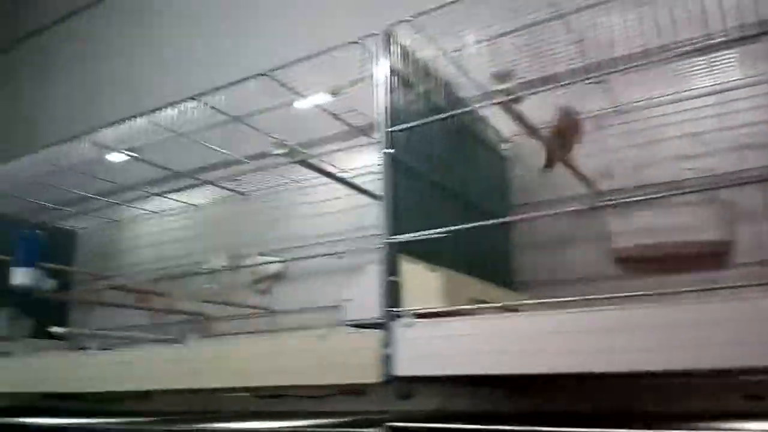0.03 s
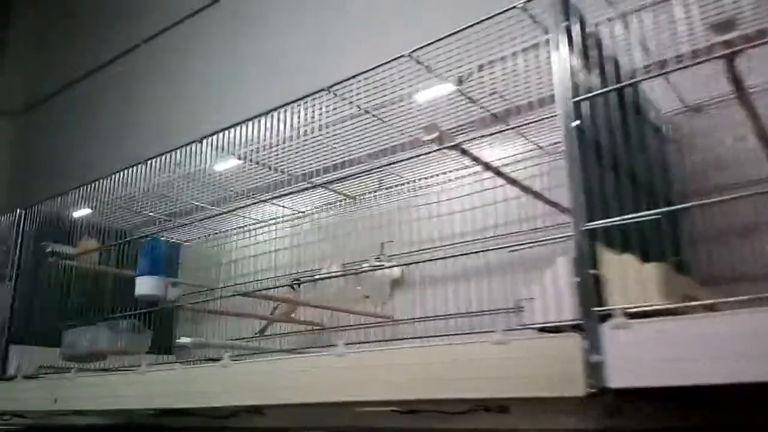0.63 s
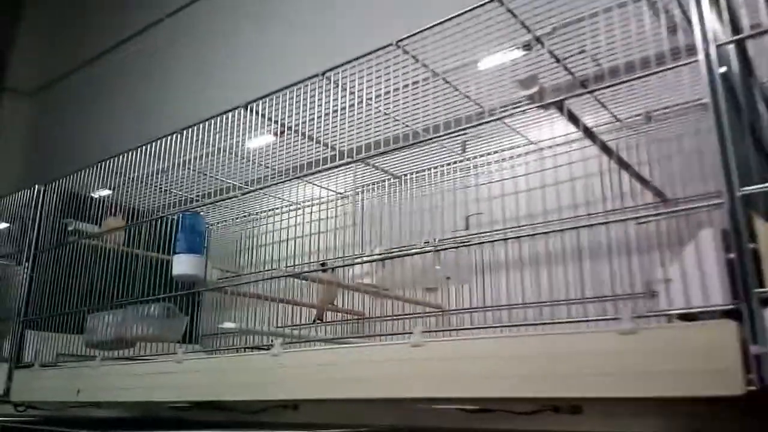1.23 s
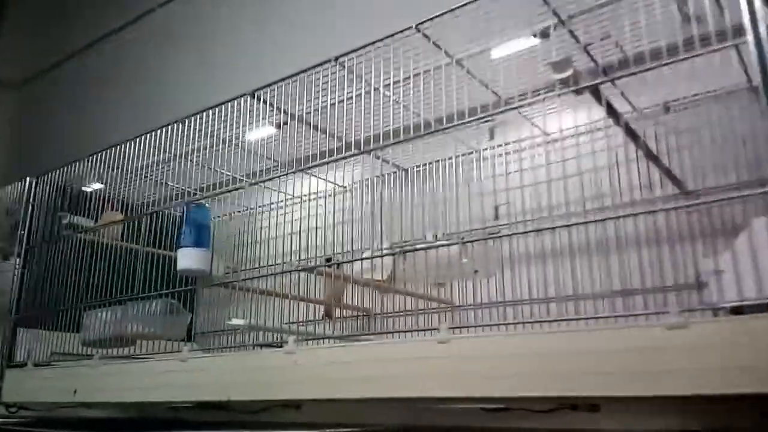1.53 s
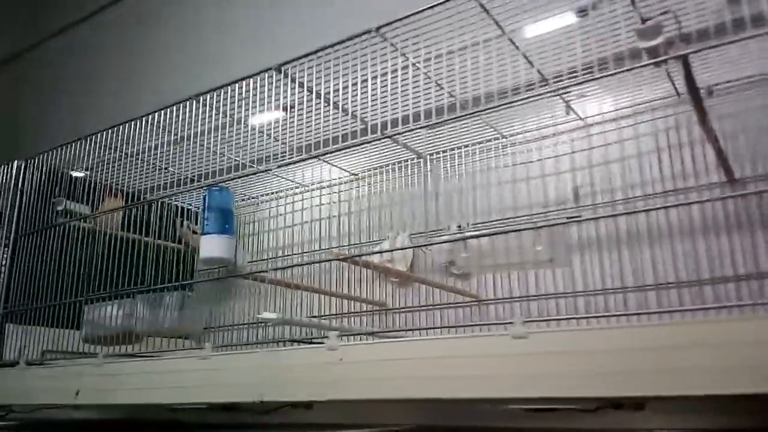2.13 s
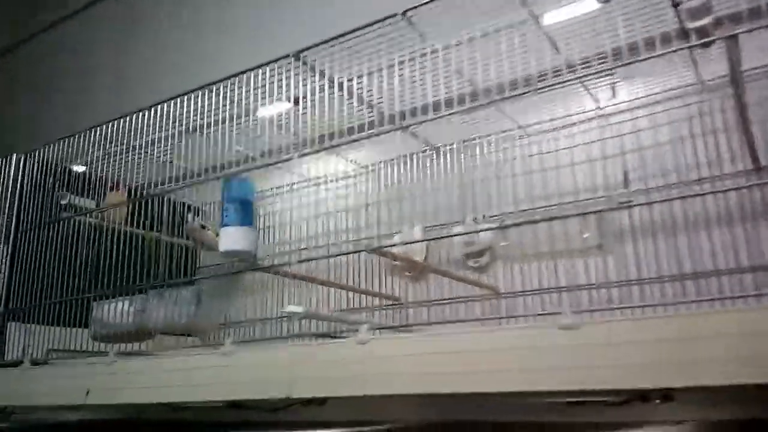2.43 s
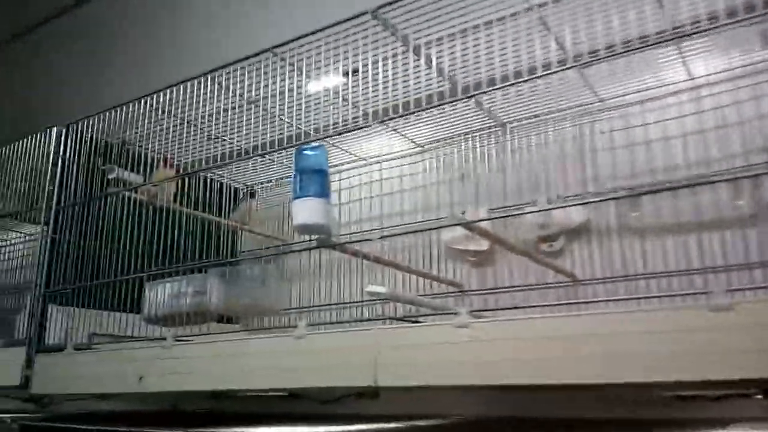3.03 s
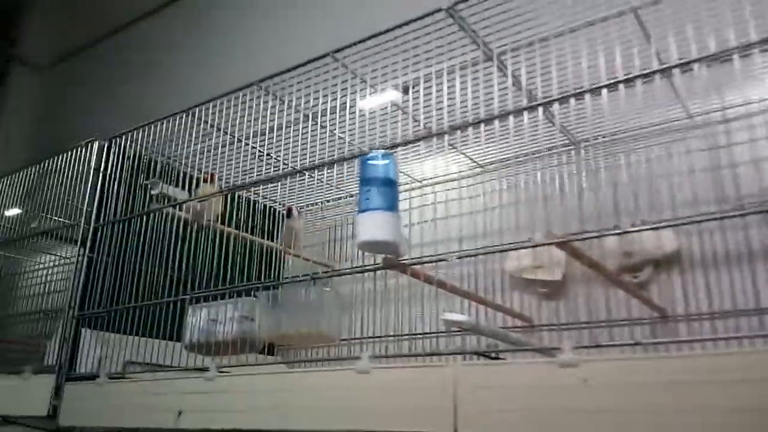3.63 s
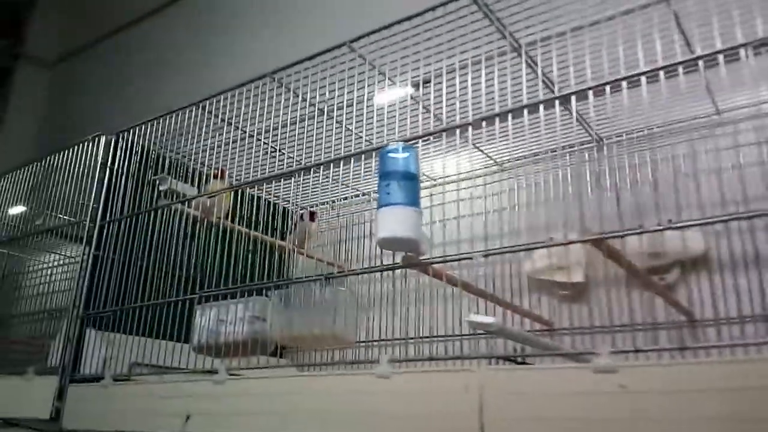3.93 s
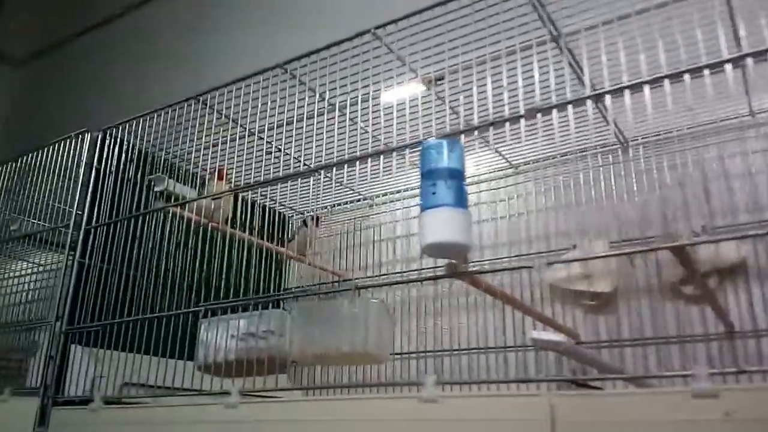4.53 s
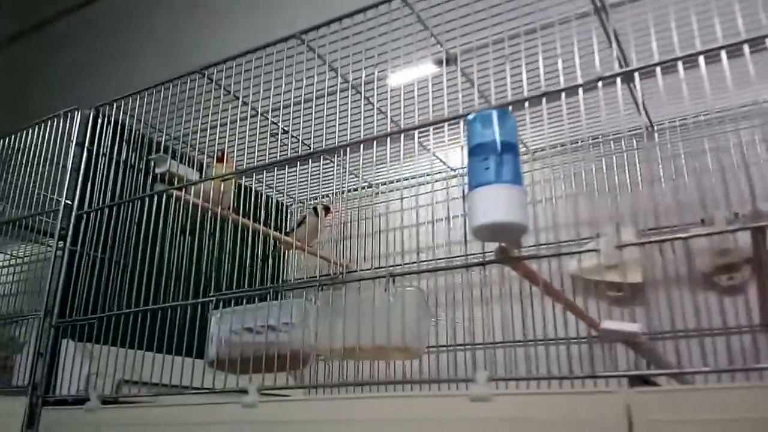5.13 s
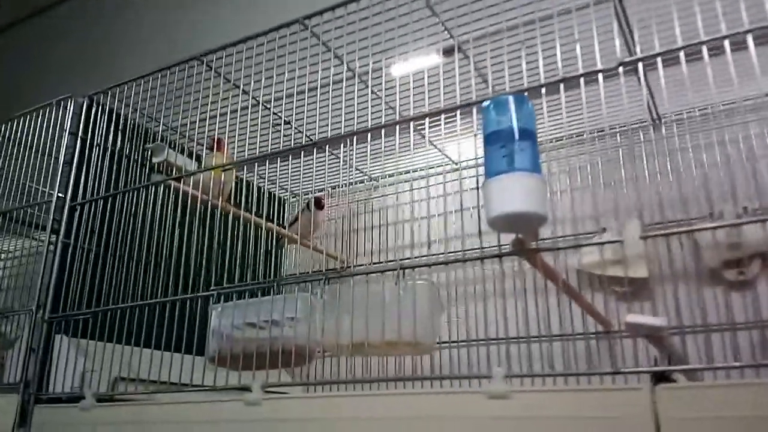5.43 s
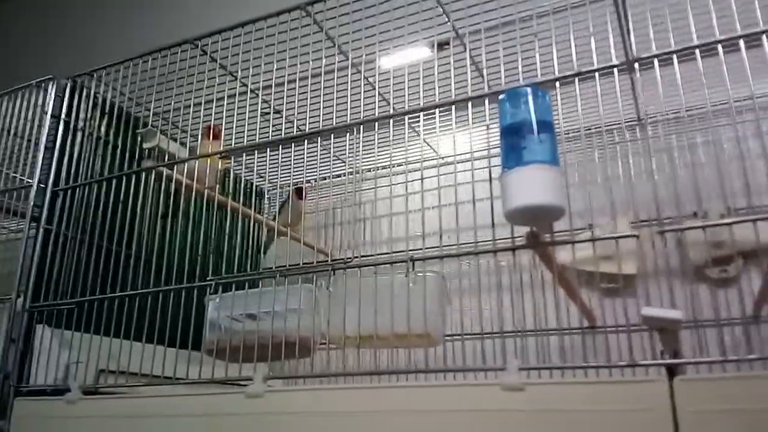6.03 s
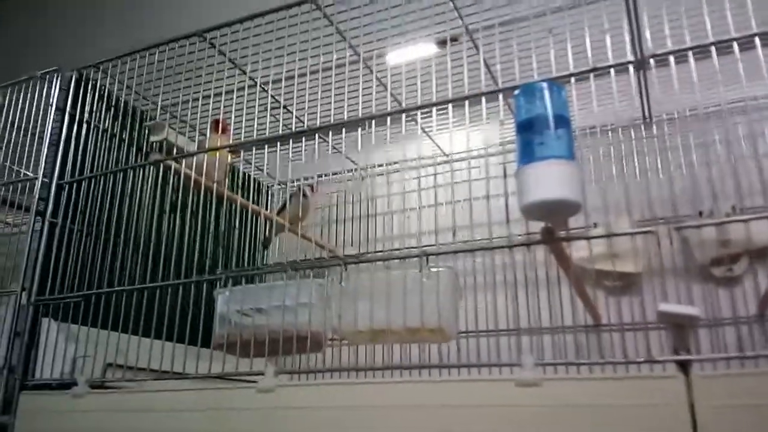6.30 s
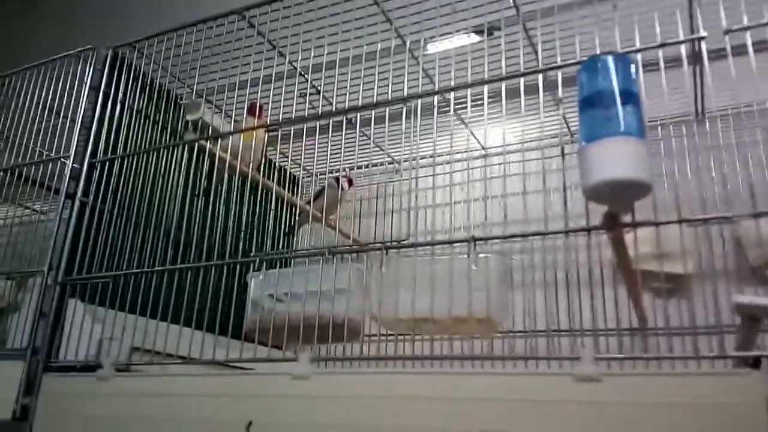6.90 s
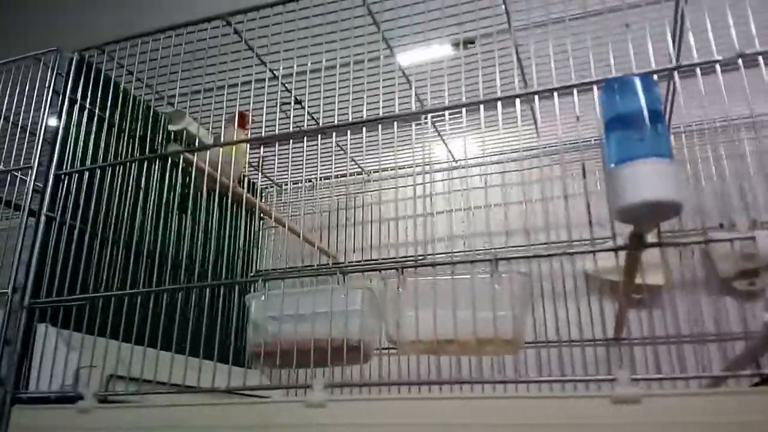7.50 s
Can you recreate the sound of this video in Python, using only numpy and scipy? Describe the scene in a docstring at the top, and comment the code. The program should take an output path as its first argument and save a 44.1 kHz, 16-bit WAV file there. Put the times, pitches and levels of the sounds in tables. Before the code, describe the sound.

Small caged finches twitter in a bare, echoing room. A loud, harsh rasp opens, lasting about a third of a second, followed by thin high pips, clear tweets and rough falling chirps around 1 second, with a light cage tap. From about 1.8 to 2.3 seconds comes a longer, softer rasp with a quick downward trill. Bright tweets follow near 2.7 seconds and more pips until 3.5. The middle is quieter: rising mews, held whistles, an arching call at about 4.3 and short buzzy churrs until 6. A sharp tweet stands out at 6.2, and high pips return after 7.2, with a few light taps on wire and perches. A slight bright microphone sizzle follows the calls. Underneath are steady room noise, a faint low electric hum, the soft rustle of someone moving along the cages and a few dull microphone bumps, mostly in the first two seconds.

```python
"""Caged finches twitter in a bare, echoing bird room: two harsh rasps, gliding calls, thin high pips.
Each call is two near-pure tones, one from each side of the syrinx, roughened by a fast tremor. A hiss
with a bright microphone sizzle follows their loudness. Light cage taps ring in the same room. Underneath
sit a faint electric hum, room noise, and the soft rustle and knocks of someone moving along the cages."""
import sys
import numpy as np
from scipy import signal
from scipy.fft import rfft, irfft, next_fast_len
from scipy.io import wavfile
from scipy.ndimage import uniform_filter1d, map_coordinates

SR = 44100
rng = np.random.default_rng(int(sys.argv[2]) if len(sys.argv) > 2 else 0)


def materialize(psi):
    """Save the field psi as 16-bit PCM at rate SR to the path in sys.argv[1].

    A 1-D psi becomes a single channel; in a 2-D psi each row is a channel.
    """
    bounded = np.clip(np.atleast_2d(psi).T, -1, 1)
    quanta = np.round(bounded * 32767).astype(np.int16)
    wavfile.write(sys.argv[1], SR, quanta)


N = 342216

# room tone: (frequency [Hz], relative density [dB])
ROOM_TONE_SPECTRUM = [(25, -16.5), (50, -10.5), (72, -16.5), (105, 8.5), (160, -11.5), (303, -3.5),
                      (385, -10), (637, -11.5), (1100, -7.5), (3180, -8.5), (3950, -16), (6380, -18),
                      (8000, -30.5), (13400, -31), (15000, -18.5)]
# slow ride of the electric hum: (time [s], level [dB])
HUM_LEVELS = [(0, -76), (3.5, -81), (5.4, -71), (5.8, -68), (7.76, -65)]
# soft bumps: (time [s], peak [dB])
KNOCK_HITS = [(0.611, -33.5), (1.492, -35), (1.751, -38), (5.907, -45.5)]
# rustle of movement along the cages: (time [s], relative level [dB])
RUSTLE_LEVELS = [(0.0, -51), (0.19, -56.5), (0.41, -44), (0.88, -51.5), (0.91, -47.5), (1.25, -56.5),
                 (1.47, -56.5), (1.49, -53), (1.53, -54.5), (1.58, -46), (1.79, -54), (1.9, -46.5),
                 (2.4, -56.5), (2.72, -54.5), (2.85, -47.5), (3.46, -50.5), (3.95, -60.5), (4.39, -56.5),
                 (5.53, -63.5), (6.07, -64), (6.27, -53.5), (6.57, -61), (6.72, -46), (6.85, -53.5),
                 (6.92, -47), (7.13, -52.5), (7.69, -46.5), (7.76, -52)]
# brushing cloth and hands: (frequency [Hz], relative density [dB])
RUSTLE_SPECTRUM = [(41, -22), (70, -6.5), (141, -3.5), (297, -1), (408, -4), (627, -5.5), (1130, -9.5),
                   (1810, -14.5), (2220, -16), (2780, -19.5), (3910, -19.5), (6420, -31.5), (8230, -45),
                   (15500, -34.5)]
# reverb decay: (frequency [Hz], time to fall 60 dB [s])
REVERB_TIMES = [(1500, 0.8), (3000, 0.56), (5000, 0.53), (7000, 0.47), (15000, 0.22)]
# light taps on the cages: (time [s], dry peak [dB])
TAP_HITS = [(.888, -26), (1.755, -55), (6.634, -36), (6.681, -44), (6.924, -53), (7.287, -39), (7.656, -37)]
# tone of a tap: (frequency [Hz], relative density [dB])
TAP_SPECTRUM = [(200, -13), (600, -14), (1100, 6.5), (2000, -1), (4000, 6.5), (6500, -17), (8500, -38)]
# hoarse patches in the calls: (time [s], length [s], dry level [dB])
HOARSE_PATCHES = [(1.841, 0.51, -46), (4.155, 0.12, -50), (5.604, 0.086, -46.5), (5.799, 0.069, -51)]
# a breaking voice: (frequency [Hz], relative density [dB])
HOARSE_SPECTRUM = [(1200, -34), (1900, 10), (3000, 19), (5200, 5), (6600, -10), (8000, -22.5), (10000, -17),
                   (12000, -32), (13700, -32), (15000, -4.5)]
# hiss around the calls, with microphone sizzle near 15 kHz: (frequency [Hz], relative density [dB])
HISS_SPECTRUM = [(1000, -10), (3000, 10.5), (6500, -6), (8300, -3), (10000, -4), (11500, -12.5), (13700, 4),
                 (14700, 8.5), (16000, -8)]
# microphone colour on the calls, whose levels below are set ahead of it: (frequency [Hz], gain [dB])
SONG_EQ = [(3000, 0), (7000, -5.5), (7700, -15.5), (8400, -22), (10000, -15), (11500, -3), (13500, 0),
           (15000, 11)]
# long rising mews:
# (time [s], length [s], start pitch [Hz], end pitch [Hz], lower voice [dB], octave voice [dB])
MEW_NOTES = [(2.398, 0.28, 1685, 1989, -54, -48), (3.657, 0.28, 1593, 1997, -54.5, -56.5),
             (4.97, .29, 1492, 2084, -54.5, -46.5), (5.537, 0.14, 1736, 2020, -58, -65),
             (6.402, .19, 1557, 2366, -58.5, -74), (6.577, 0.17, 1658, 2008, -53, -51),
             (7.607, 0.15, 1530, 1842, -56.5, -51)]
# held whistles; an upper pitch near or above the octave is pulled onto it:
# (time [s], length [s], lower pitch [Hz], upper pitch [Hz], lower voice [dB], upper voice [dB])
WHISTLE_NOTES = [(1.04, 0.12, 1398, 2804, -56, -45.5), (1.095, 0.076, 1770, 3510, -48, -49),
                 (2.541, .34, 1472, 3000, -50.5, -44.5), (4.155, 0.33, 1485, 2980, -50.5, -46),
                 (5.645, 0.18, 2040, 3475, -52.5, -53.5), (5.838, 0.066, 2013, 3357, -77, -43.5),
                 (6.321, .13, 3260, 6520, -45, -56.5), (6.487, .16, 2856, 4530, -55.5, -73)]
# buzzy churrs: (time [s], length [s], upper/lower pitch [ratio], lower voice [dB])
CHURR_NOTES = [(4.503, 0.046, 1.48, -48.5), (4.62, .066, 1.36, -45), (4.95, 0.039, 1.42, -46.5),
               (5.317, 0.14, 1.31, -44), (5.613, .115, 1.25, -42.5), (5.803, .074, 1.22, -46)]
# rough falling slides:
# (time [s], length [s], start pitch [Hz], upper/lower pitch [ratio], lower voice [dB], upper voice [dB])
SLIDE_NOTES = [(0.309, 0.08, 6230, 1.24, -58, -44), (0.95, .046, 3350, 1.22, -38, -36.5),
               (0.998, .051, 3373, 1.244, -33, -29.5), (1.036, 0.0463, 3070, 1.2, -41.5, -48),
               (1.451, 0.05, 2853, 1.39, -47.5, -50.5), (2.739, 0.072, 3372, 1.274, -35, -33.5),
               (2.79, 0.072, 3160, 1.28, -40.5, -42), (3.609, 0.0515, 3035, 1.42, -50, -49.5),
               (4.389, 0.091, 4250, 1, -52, -60), (6.283, .068, 3954, 1.33, -34.5, -53)]
# one arching call: (time [s], top pitch [Hz], lower voice [dB], octave voice [dB], buzz [share of pitch])
ARCH_CURVE = [(4.173, 1900, -75, -44, 0.32), (4.23, 2696, -50.5, -42, 0.2), (4.3, 3163, -44, -42.5, .1),
              (4.335, 3228, -37.5, -44.5, 0.024), (4.415, 3005, -36.5, -57, 0.026),
              (4.43, 3073, -39, -58, 0.036), (4.47, 2830, -37.5, -62, 0.045)]
# clear scooping tweets: (time [s], length [s], top pitch [Hz], scoop [share of pitch],
# upper/lower pitch [ratio], lower voice [dB], upper voice [dB], buzz [share of pitch])
TWEET_NOTES = [(0.182, .05, 5130, 0.12, 1.1, -31, -64, .004),
               (0.834, 0.077, 3810, 0.073, 1.25, -29.5, -30.5, 0.015),
               (1.737, 0.0828, 3980, 0.1094, 1.23, -29, -33.5, 0.021),
               (2.599, 0.093, 3690, 0.032, 1.247, -34.5, -35.5, 0.0069),
               (2.876, 0.13, 2314, 0.17, 1.15, -48, -59, 0.02),
               (3.921, 0.11, 2345, 0.08, 1.31, -52, -53.5, 0.014),
               (4.834, 0.092, 2350, 0.0388, 1.25, -57, -62, .005),
               (6.222, 0.079, 4130, 0.097, 1.285, -29, -32.5, 0.023),
               (7.605, 0.18, 2350, .06, 1.28, -56, -61, .008)]
# thin high pips: (time [s], lower pitch [Hz], upper pitch [Hz], opening bend [share of pitch],
# lower voice [dB], upper voice [dB])
PIP_NOTES = [(.362, 5090, 5770, 0.17, -40, -47.5), (.682, 5960, 7110, 0.055, -42.5, -43.5),
             (.911, 5630, 6580, 0.11, -47.5, -55), (1.461, 5490, 6830, 0.054, -46.5, -52),
             (1.665, 6020, 6970, 0.036, -41, -43.5), (1.803, 4800, 7130, 0.21, -40, -40.5),
             (1.864, 5600, 6450, 0.028, -38, -34), (2.032, 5740, 6700, .16, -32, -39.5),
             (2.212, 5840, 6460, .12, -45, -46), (2.28, 5670, 6340, 0.18, -44, -56),
             (3.13, 5925, 6500, -0.049, -40.5, -75), (3.365, 5500, 6840, 0.126, -38, -41),
             (3.545, 5190, 6400, 0.094, -34, -41), (7.262, 5720, 7130, 0.14, -33.5, -42),
             (7.382, 5140, 6040, 0.14, -35.5, -38.5), (7.667, 5980, 6660, 0.043, -46.5, -75)]
# down-slurs of the trill: (time [s], lower voice [dB])
TRILL_NOTES = [(1.872, -35), (1.936, -34.5), (2.004, -35), (2.07, -37), (2.143, -35.5), (2.213, -54)]
# throat and beak resonance in a rasp: (frequency [Hz], relative gain [dB])
THROAT_RESONANCE = [(1500, -17), (2300, -12.5), (3000, -10), (3500, -0.5), (4000, 4), (4500, -5),
                    (4900, 0.5), (5500, -15.5), (7000, -20)]
# the loud opening rasp: (time [s], top of the flutter [Hz], fluttering voice [dB], held voice [dB])
LOUD_RASP_CURVE = [(0, 5400, -23.5, -29), (.05, 5445, -31.5, -34), (.12, 5000, -29.5, -27.5),
                   (.2, 4846, -32.5, -24.5), (.25, 5550, -30, -38), (.28, 5400, -34.5, -55),
                   (.32, 5160, -45, -58)]
# the longer, softer rasp: (time [s], top of the flutter [Hz], fluttering voice [dB], held voice [dB])
LONG_RASP_CURVE = [(1.835, 5250, -38, -31), (1.97, 5446, -37, -35), (2.1, 5260, -37.5, -33.5),
                   (2.25, 4840, -42, -34), (2.29, 4630, -50, -34)]


def from_db(db):
    """Decibels to gain."""
    return 10 ** (np.asarray(db) / 20)


def rms_one(x):
    """Scale to unit power."""
    return x / np.sqrt(np.mean(x ** 2) + 1e-20)


def at_hz(points, hz):
    """Read a table on a log-frequency axis."""
    known_hz, values = np.transpose(points)
    return np.interp(np.log(np.maximum(hz, 1)), np.log(known_hz), values)


def equalise(x, curve):
    """EQ by a table of (frequency [Hz], gain [dB])."""
    size = next_fast_len(len(x) + SR // 10)
    gain = from_db(at_hz(curve, np.fft.rfftfreq(size, 1 / SR)))
    return irfft(rfft(x, size) * gain, size)[:len(x)]


def noise(spectrum):
    """Coloured noise of unit power."""
    return rms_one(equalise(rng.standard_normal(N), spectrum))


def drift(t, rate_hz):
    """Smooth random modulation with a spread of about 1."""
    return map_coordinates(rng.standard_normal(1024), [t * rate_hz], order=3, mode="wrap")


def phase_of(hz):
    """Running phase in radians."""
    return 2 * np.pi * np.cumsum(hz) / SR


def fade(t, attack_s, release_s):
    """Rounded fade-in and fade-out of a note."""
    opening = np.sin(np.pi / 2 * np.clip(t / attack_s, 0, 1))
    closing = np.sin(np.pi / 2 * np.clip((t[-1] - t) / release_s, 0, 1))
    return opening * closing


def add(track, at_s, sound):
    """Mix a sound in at its cue."""
    start = int(np.clip(at_s * SR, 0, N - 1))
    track[start:start + len(sound)] += sound[:N - start]


def note_time(length_s):
    """Seconds since a note began, and its progress from 0 to 1."""
    t = np.arange(int(length_s * SR)) / SR
    return t, t / length_s


def automation(curve):
    """Seconds since a call began, then each of its controls at every sample."""
    times, *columns = np.transpose(curve)
    t, _ = note_time(times[-1] - times[0])
    return t, *(np.interp(t + times[0], times, column) for column in columns)


def room_tone(level_db=-58.5):
    """A steady bed of room noise."""
    return from_db(level_db) * noise(ROOM_TONE_SPECTRUM)


def electric_hum(pitch_hz=67, waver=0.022, throb_db=2):
    """A faint low sine that wavers in pitch and level."""
    t = np.arange(N) / SR
    level_db = np.interp(t, *np.transpose(HUM_LEVELS)) + throb_db * drift(t, 2.7)
    hz = pitch_hz * (1 + waver * drift(t, 6.7))
    return from_db(level_db) * np.sqrt(2) * np.sin(phase_of(hz))


def knocks(decay_s=0.0063, band_hz=(90, 280)):
    """Dull bumps on the microphone's housing."""
    t, track = np.arange(SR // 10) / SR, np.zeros(N)
    body = signal.butter(2, band_hz, "band", fs=SR, output="sos")
    for at_s, peak_db in KNOCK_HITS:
        bump = signal.sosfilt(body, rng.standard_normal(len(t)) * np.exp(-t / decay_s))
        add(track, at_s, from_db(peak_db) * bump / np.abs(bump).max())
    return track


def rustle(gain_db=1.0, grain_db=1.5):
    """Cloth and hands brush unevenly, swelling with each movement."""
    t = np.arange(N) / SR
    level_db = np.interp(t, *np.transpose(RUSTLE_LEVELS)) + gain_db + grain_db * drift(t, 70)
    return from_db(level_db) * noise(RUSTLE_SPECTRUM)


def taps(decay_s=0.0024):
    """Short dry contacts on perches and wire."""
    t, track = np.arange(SR // 20) / SR, np.zeros(N)
    for at_s, peak_db in TAP_HITS:
        tap = equalise(rng.standard_normal(len(t)), TAP_SPECTRUM) * np.exp(-t / decay_s)
        add(track, at_s, from_db(peak_db) * tap / np.abs(tap).max())
    return track


def room_reverb(x, direct_db=-1.5, early_db=-6.5, tail_db=-3.5, early_s=0.045, echoes=14):
    """Direct sound, hard echoes off cage walls and ceiling, then a tail whose treble dies first."""
    t, tail = np.arange(SR) / SR, np.zeros(SR)
    edges_hz = np.geomspace(700, 18000, num=9)
    for low, high in zip(edges_hz, edges_hz[1:]):
        bandpass = signal.butter(2, [low, high], "band", fs=SR, output="sos")
        decay = np.exp(-np.log(1000) * t / at_hz(REVERB_TIMES, np.sqrt(low * high)))
        tail += signal.sosfilt(bandpass, rng.standard_normal(SR)) * decay
    tail *= np.clip(t / 0.013, 0, 1)   # the tail blooms over 13 ms
    early = np.zeros(SR)
    polarities = rng.choice([-1, 1], echoes)
    delays = (rng.uniform(0.04, 1, echoes) * early_s * SR).astype(int)
    early[delays] = polarities / np.sqrt(echoes)
    response = from_db(early_db) * early + from_db(tail_db) * tail / np.linalg.norm(tail)
    response[0] += from_db(direct_db)
    return signal.fftconvolve(x, response)[:N]


def hoarseness():
    """Now and then a voice breaks into noise."""
    envelope = np.zeros(N)
    for at_s, length_s, level_db in HOARSE_PATCHES:
        t, _ = note_time(length_s)
        add(envelope, at_s, from_db(level_db) * fade(t, attack_s=0.015, release_s=0.046))
    return envelope * noise(HOARSE_SPECTRUM)


def call_hiss(song, gain_db=-33):
    """Hiss that follows the calls' loudness, with a bright microphone sizzle near 15 kHz."""
    envelope = np.sqrt(np.abs(uniform_filter1d(song ** 2, size=128)))
    return from_db(gain_db) * envelope * noise(HISS_SPECTRUM)


def membrane(hz, second_db, third_db=-42):
    """A vibrating syrinx membrane: an almost pure tone with two weak overtones."""
    phase = phase_of(hz)
    overtones = from_db(second_db) * np.sin(2 * phase) + from_db(third_db) * np.sin(3 * phase)
    return np.sqrt(2) * (np.sin(phase) + overtones)


def flutter(t, rate_hz, unevenness=0.3):
    """Fast, uneven tremor of the syrinx between -1 and 1."""
    return np.sin(phase_of(rate_hz * (1 + unevenness * drift(t, 150))))


def syrinx(t, hz, ratio, lower_db, upper_db, buzz, coupling_db, waver=0.0053, shimmer_db=4, sum_db=-27):
    """Both sides follow one pitch line; tremor adds buzz, and coupling adds faint combination tones."""
    hz = hz * (1 + buzz * flutter(t, rate_hz=190, unevenness=0.238) + waver * drift(t, 71.35))
    lower = from_db(lower_db) * membrane(hz, second_db=-28)
    upper = from_db(upper_db) * membrane(hz * ratio, second_db=-29, third_db=-43)
    sideband = from_db(upper_db + coupling_db) * membrane(hz * (2 * ratio - 1), second_db=-15.5)
    sum_tone = from_db(np.minimum(lower_db, upper_db) + sum_db) * membrane(hz * (1 + ratio), second_db=-30)
    return (lower + upper + sideband + sum_tone) * from_db(shimmer_db * drift(t, 60.6))


def mews(gain_db=0.26, easing=0.62):
    """A mew rises slowly, its voices locked an octave apart."""
    for at_s, length_s, start_hz, end_hz, lower_db, upper_db in MEW_NOTES:
        t, progress = note_time(length_s)
        hz = start_hz + (end_hz - start_hz) * progress ** easing
        voices = syrinx(t, hz, 2, lower_db, upper_db, buzz=0.023, coupling_db=-31)
        envelope = fade(t, attack_s=0.084 * length_s, release_s=0.079 * length_s)
        yield at_s, from_db(gain_db) * voices * envelope


def whistles(gain_db=0.5, sag=0.01, wander=0.00399):
    """A held note sags and wanders slightly about its pitch."""
    for at_s, length_s, lower_hz, upper_hz, lower_db, upper_db in WHISTLE_NOTES:
        t, progress = note_time(length_s)
        ratio = 2 if upper_hz > 1.8 * lower_hz else upper_hz / lower_hz   # voices lock near the octave
        hz = lower_hz * (1 + sag * (0.5 - progress) + wander * drift(t, 19.1))
        voices = syrinx(t, hz, ratio, lower_db, upper_db, buzz=0.02, coupling_db=-25)
        yield at_s, from_db(gain_db) * voices * fade(t, attack_s=0.016, release_s=0.012)


def churrs(top_hz=2750, climb=0.22, easing=2.1, upper_db=-2.5):
    """A churr climbs quickly and levels off, buzzing all the way."""
    for at_s, length_s, ratio, level_db in CHURR_NOTES:
        t, progress = note_time(length_s)
        hz = top_hz * (1 - climb * (1 - progress) ** easing)
        voices = syrinx(t, hz, ratio, level_db, level_db + upper_db, buzz=0.032, coupling_db=-18)
        yield at_s, voices * fade(t, attack_s=0.33 * length_s, release_s=0.02)


def slides(gain_db=-0.54, fall=0.14, steepening=1.393):
    """A rough slide falls ever faster, always by the same interval."""
    for at_s, length_s, start_hz, ratio, lower_db, upper_db in SLIDE_NOTES:
        t, progress = note_time(length_s)
        hz = start_hz * (1 - fall * progress ** steepening)
        voices = syrinx(t, hz, ratio, lower_db, upper_db, buzz=0.028, coupling_db=-21)
        yield at_s, from_db(gain_db) * voices * fade(t, attack_s=0.016, release_s=0.029)


def arch():
    """One call rises and falls; flutter drags its pitch down in a buzz that clears at the top."""
    t, top_hz, lower_db, octave_db, depth = automation(ARCH_CURVE)
    drag = ((1 + flutter(t, rate_hz=190, unevenness=0.29)) / 2) ** 2
    voices = syrinx(t, top_hz * (1 - depth * drag), 2, lower_db, octave_db, buzz=0.0018, coupling_db=-22)
    return ARCH_CURVE[0][0], voices * fade(t, attack_s=0.01, release_s=0.015)


def tweets(gain_db=-1.2, settle_share=0.291):
    """A clear tweet swells while it scoops up onto its pitch."""
    for at_s, length_s, top_hz, scoop, ratio, lower_db, upper_db, buzz in TWEET_NOTES:
        t, progress = note_time(length_s)
        hz = top_hz * (1 - scoop * np.exp(-progress / settle_share))
        voices = syrinx(t, hz, ratio, lower_db, upper_db, buzz, coupling_db=-23)
        yield at_s, from_db(gain_db) * voices * fade(t, attack_s=0.03, release_s=0.02)


def pips(gain_db=4, length_s=0.033, settle_s=0.0064, lower_buzz=0.005, upper_buzz=0.028, shimmer_db=2):
    """Both voices snap onto high held pitches, nearly always from above; the upper is the rougher."""
    t, _ = note_time(length_s)
    envelope = fade(t, attack_s=0.0019, release_s=0.014)
    for at_s, lower_hz, upper_hz, opening_bend, lower_db, upper_db in PIP_NOTES:
        bend = 1 + opening_bend * np.exp(-t / settle_s)
        tremor = flutter(t, rate_hz=210)
        lower = from_db(lower_db) * membrane(lower_hz * (bend + lower_buzz * tremor), second_db=-26.5)
        upper = from_db(upper_db) * membrane(upper_hz * (bend + upper_buzz * tremor), second_db=-24.5)
        yield at_s, (lower + upper) * envelope * from_db(gain_db + shimmer_db * drift(t, 260))


def trill(length_s=0.03, top_hz=5900, bottom_hz=4000, ratio=1.33, upper_db=-9):
    """The same steep two-voiced down-slur, repeated."""
    t, progress = note_time(length_s)
    hz = top_hz * (bottom_hz / top_hz) ** progress
    lower = membrane(hz, second_db=-22.5, third_db=-30)
    upper = from_db(upper_db) * membrane(hz * ratio, second_db=-32)
    for at_s, level_db in TRILL_NOTES:
        yield at_s, from_db(level_db) * (lower + upper) * fade(t, attack_s=0.0044, release_s=0.0033)


def rasp(curve, low_hz, rate_hz, held_hz, glide, shimmer_db, waver):
    """One voice whips up and down, flaring as it crosses the throat resonance; the other wavers on it."""
    t, high_hz, whip_db, held_db = automation(curve)
    whip_hz = low_hz + (high_hz - low_hz) * (1 + flutter(t, rate_hz)) / 2
    flares = rms_one(from_db(at_hz(THROAT_RESONANCE, whip_hz) + shimmer_db * drift(t, 350)))
    whip = from_db(whip_db) * flares * membrane(whip_hz, second_db=-43.5, third_db=-55)
    throb = rms_one(from_db(shimmer_db * drift(t, 102.3)))
    wavering_hz = held_hz * (1 + glide * t / t[-1] + waver * drift(t, 160))
    held = from_db(held_db) * throb * membrane(wavering_hz, second_db=-35, third_db=-53)
    return curve[0][0], (whip + held) * fade(t, attack_s=0.0005, release_s=0.0087)


def finches():
    """Every call on one dry track, EQ'd, with hiss and hoarseness layered on top."""
    loud_rasp = rasp(LOUD_RASP_CURVE, low_hz=2488, rate_hz=165, held_hz=4070,
                     glide=0.0197, shimmer_db=6.5, waver=0.038)
    long_rasp = rasp(LONG_RASP_CURVE, low_hz=2104, rate_hz=170, held_hz=4120,
                     glide=-0.046, shimmer_db=9, waver=0.045)
    song = np.zeros(N)
    for at_s, call in [*tweets(), *slides(), *churrs(), *mews(), *whistles(), arch(),
                       *pips(), *trill(), loud_rasp, long_rasp]:
        add(song, at_s, call)
    song = equalise(song, SONG_EQ)
    return song + call_hiss(song) + hoarseness()


def scene():
    """Mono mix: finches and taps in the reverb, over dry movement, hum and room tone."""
    return (room_reverb(finches() + taps()) + rustle() + knocks() + electric_hum() + room_tone())[None]


def record(dry, cutoff_hz=15600):
    """A steep high cut on the whole mix."""
    return signal.sosfilt(signal.ellip(10, 0.2, 70, cutoff_hz, fs=SR, output="sos"), dry)


dry = scene()
out = record(dry)
materialize(out)
```